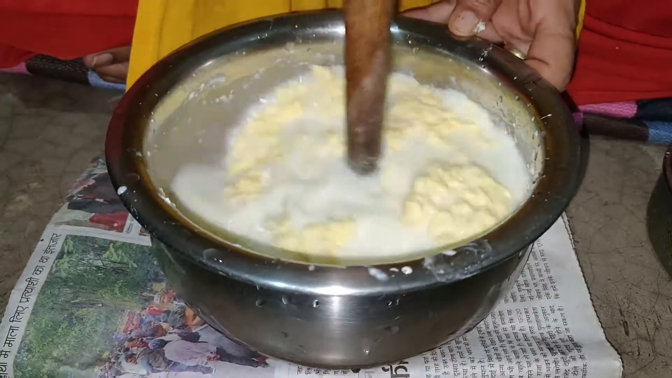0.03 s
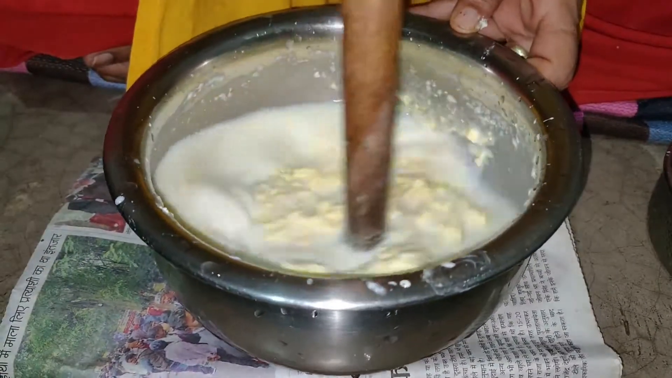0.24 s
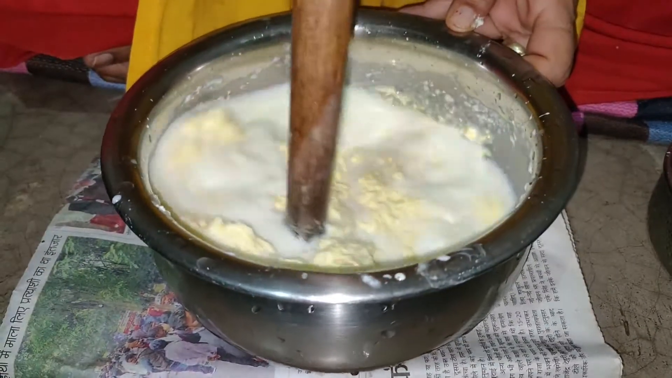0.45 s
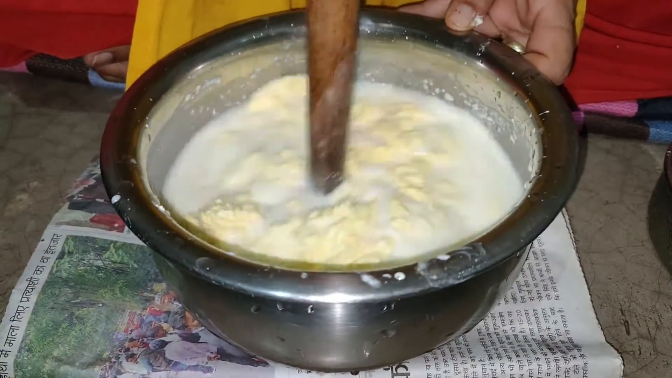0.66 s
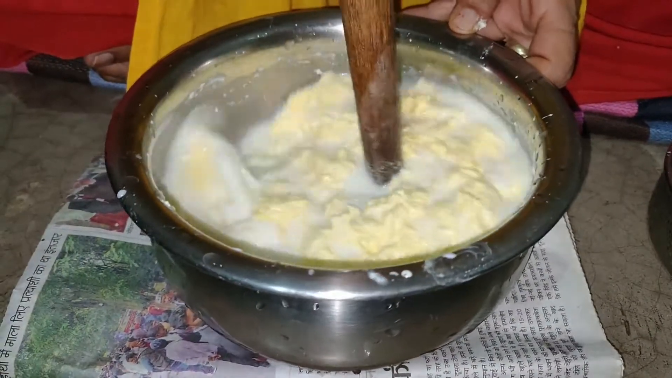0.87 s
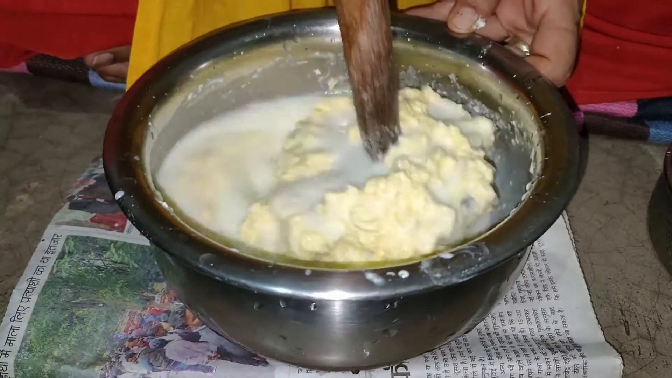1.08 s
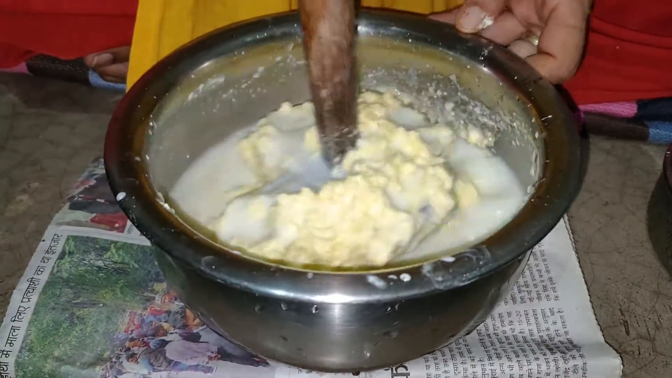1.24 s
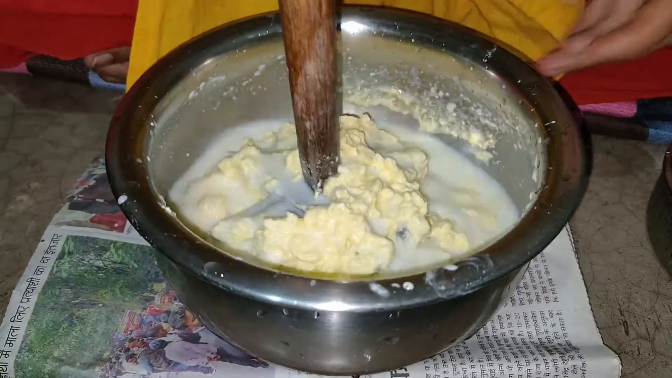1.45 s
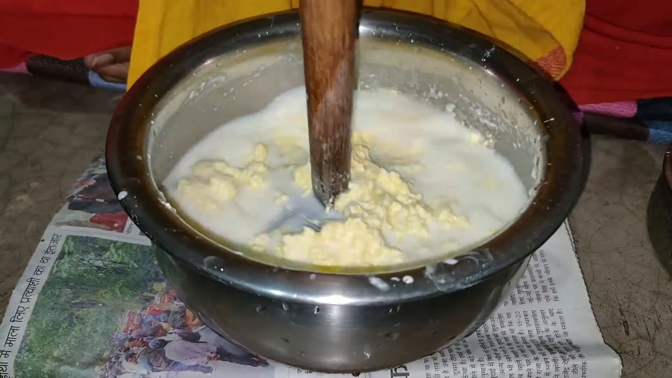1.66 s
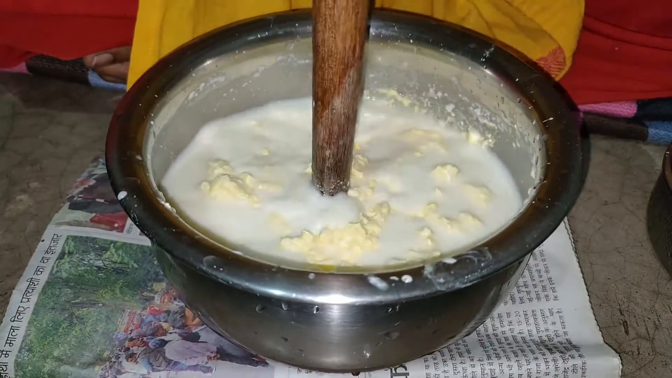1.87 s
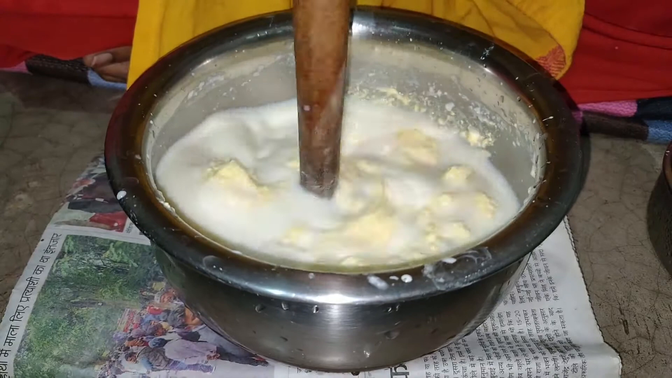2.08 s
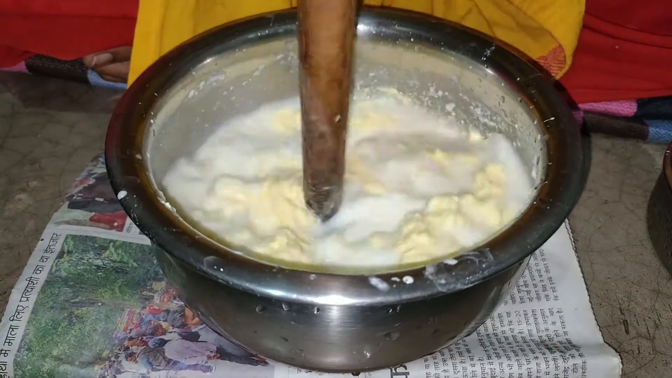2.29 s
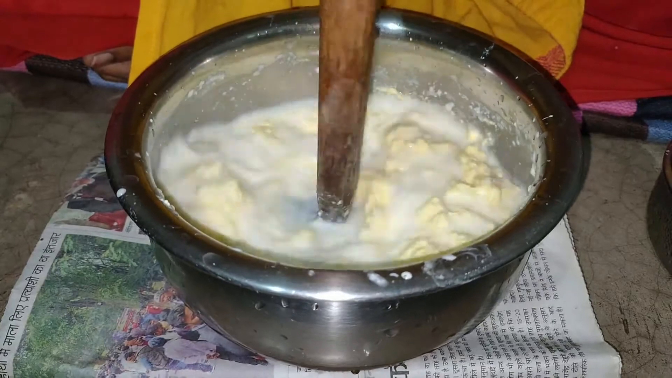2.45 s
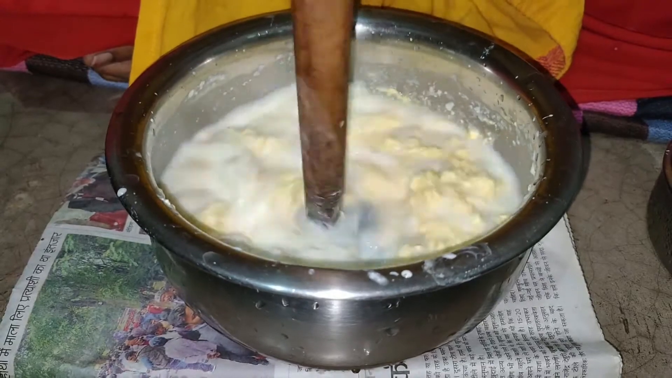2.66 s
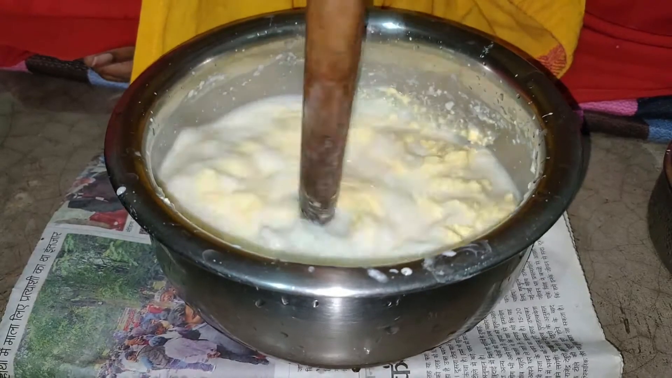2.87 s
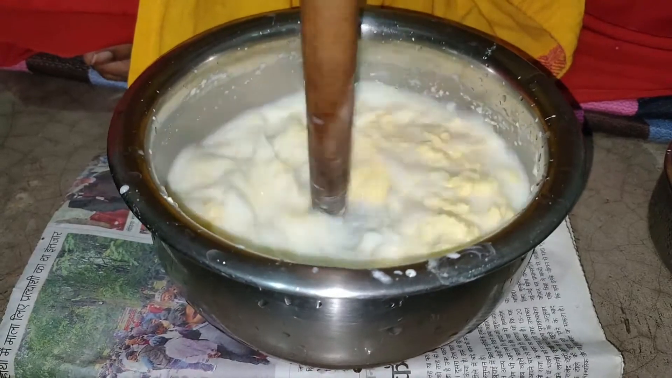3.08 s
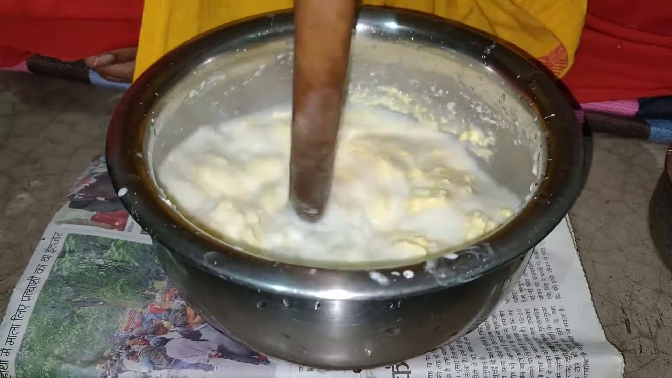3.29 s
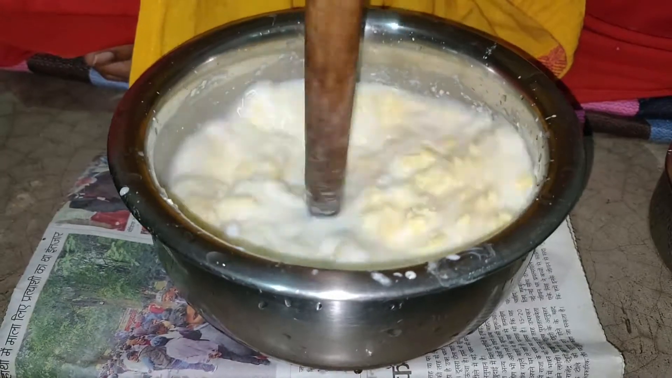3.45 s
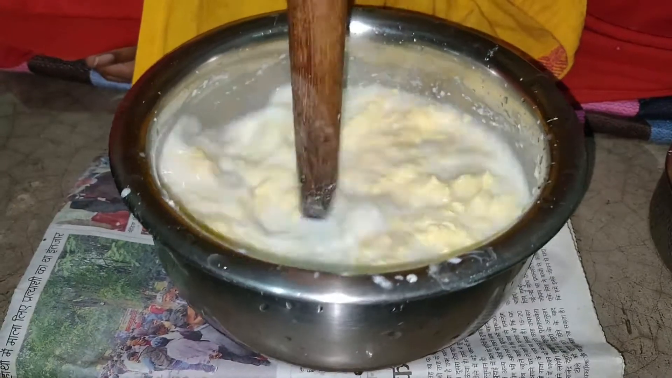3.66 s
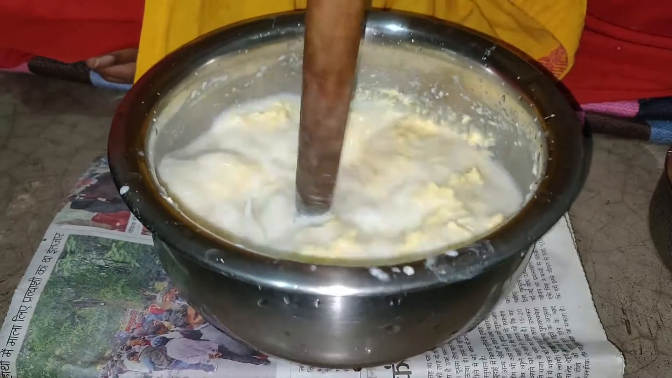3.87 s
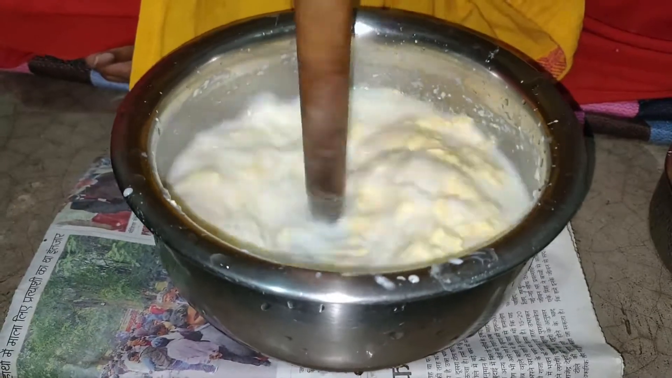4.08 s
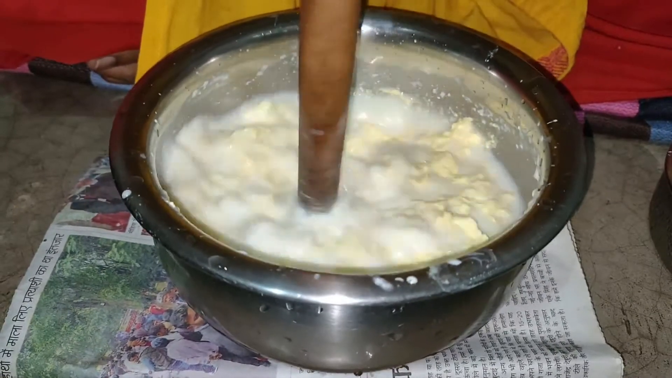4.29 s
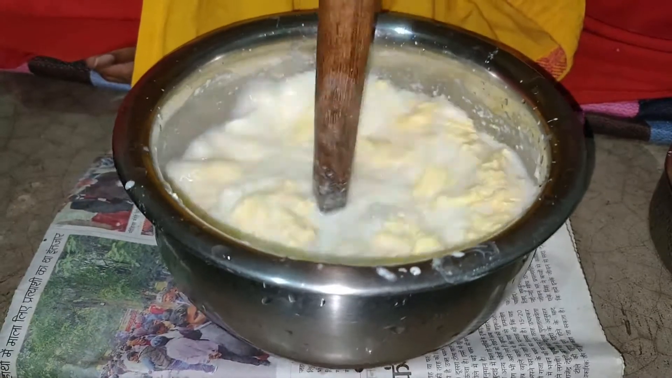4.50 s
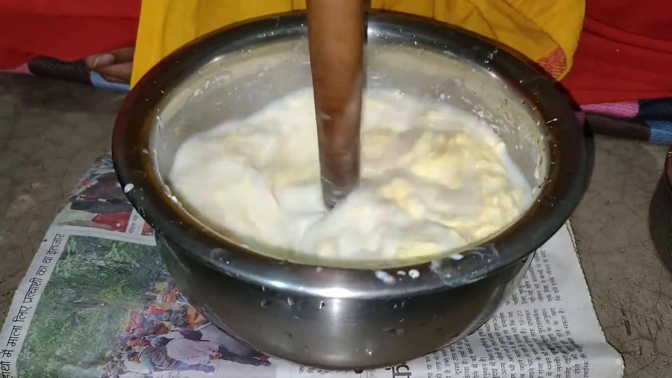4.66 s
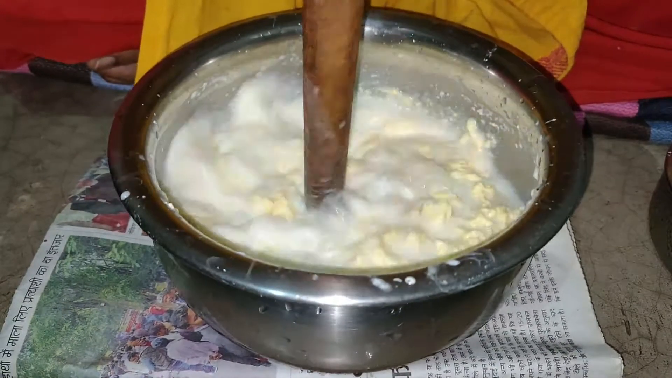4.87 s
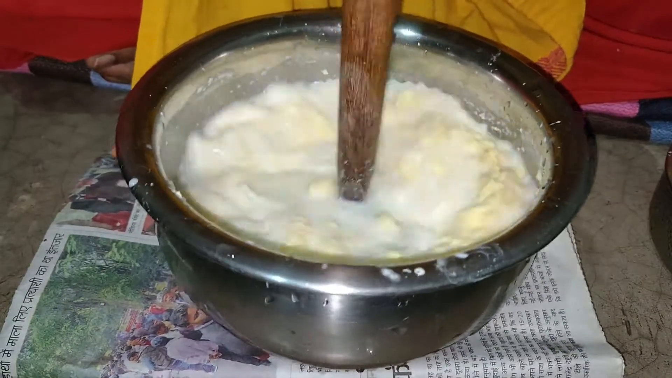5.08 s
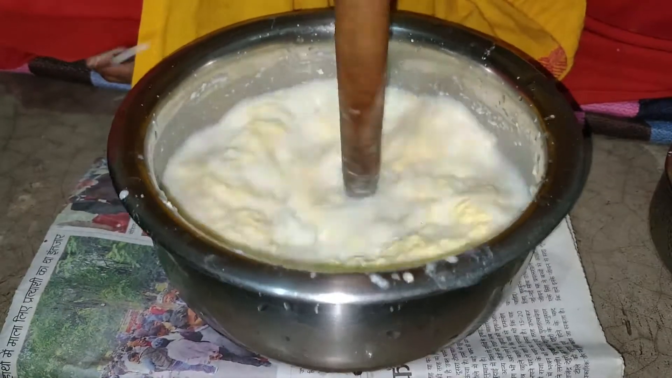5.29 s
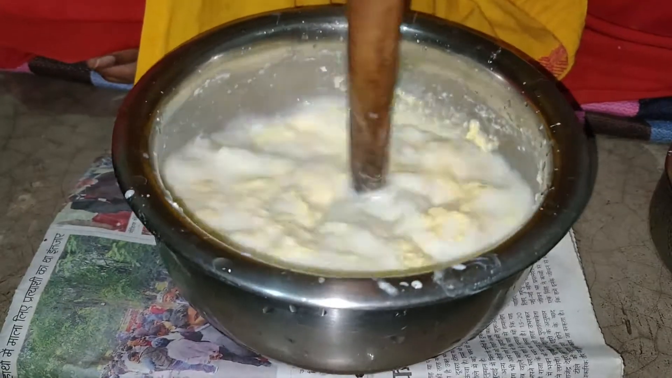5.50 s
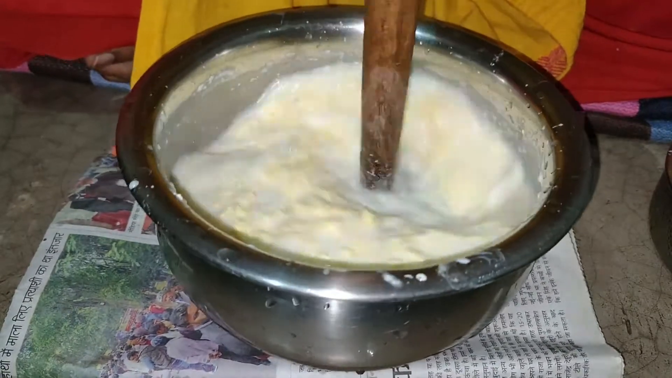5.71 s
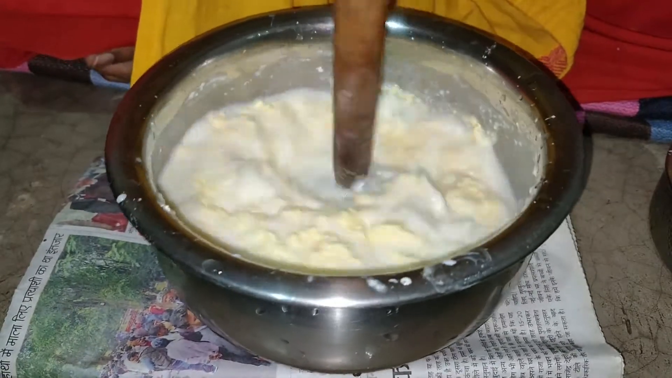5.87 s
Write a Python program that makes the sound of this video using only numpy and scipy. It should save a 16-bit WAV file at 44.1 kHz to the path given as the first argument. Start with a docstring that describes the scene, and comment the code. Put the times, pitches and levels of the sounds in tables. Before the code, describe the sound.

A wooden churn works thick, buttery liquid in a full steel bowl, close up in a small room with a low ceiling reflection and short tail. In the first second there are only soft, damped thuds near 0.04, 0.3, 0.4 and 0.83 s, with tiny plops and a faint clink. Small bubbles and drops spatter at about 1.0 to 1.5 s, sharpest near 1.45, then it quiets. At 2.15 s a short low bump knocks the right microphone. From 2.4 s strokes crowd together: lumpy slosh, gurgle and hollow mid-pitched plops, sharp spits of drops, and bright, short clinks at 2.7, 3.05, 3.5 and 4.07 s. The churning grows fuller and louder, with an especially strong plop at 4.8 s and heavy swashing from 5.3 s. Two close thuds land at 5.9 s. Left is bright; right is duller, with steady hollow hiss throughout.

```python
"""A wooden churn is twirled in a steel bowl of cream that is breaking into butter, in a small kitchen.
At first damped bowl modes thud softly; after a second bubbles and drops spatter, and at 2.15 s the
right microphone is bumped. Then the strokes crowd together: swarms of bubbles slosh and gurgle, large
air pockets plop, drops spit, sines clink, and two last thuds fall near the end. Throughout, the ceiling
and a short tail answer the bowl, and filtered noise hisses in the right microphone."""
import sys
import numpy as np
from scipy import signal
from scipy.fft import rfft, irfft
from scipy.io import wavfile

SR = 44100
rng = np.random.default_rng(int(sys.argv[2]) if len(sys.argv) > 2 else 0)


def transcribe(u):
    """Save the signal u as a 16-bit wav file named by the first command-line argument.

    u: samples, shape (n,) or (channels, n), limited to [-1, 1]; the rate is SR.
    q: integer samples, one column per channel.
    """
    v = np.clip(np.atleast_2d(u).T, -1, 1)
    q = np.round(v * 32767).astype(np.int16)
    wavfile.write(sys.argv[1], SR, q)


N = 261954
TIME = np.arange(N) / SR

# the churn nudges the bottom of the bowl: t/s, relative level/dB
NUDGES = [(0.036, -15.5), (0.266, -26), (0.408, -22.5), (0.825, -16.5), (0.838, -27), (2.673, -31.5),
          (5.897, -12.5), (5.919, -19)]


def from_db(db):
    """Amplitude ratio: 20 dB is a factor of ten."""
    return 10 ** (np.asarray(db) / 20)


def rms_one(x):
    """Normalization: mean square, hence power, becomes one."""
    return x / np.sqrt(np.mean(x ** 2) + 1e-20)


def at_hz(points, hz, column=1):
    """Interpolation on a logarithmic frequency axis, where equal ratios are equal steps."""
    points = np.array(points)
    return np.interp(np.log(hz + 1e-3), np.log(points[:, 0]), points[:, column])


def cut(x, hz, kind, order=2):
    """Butterworth filtering: a maximally flat pass band."""
    sections = signal.butter(order, hz, kind, fs=SR, output="sos")
    return signal.sosfilt(sections, x + 1e-18)


def delayed(x, s):
    """Propagation delay: the same signal s seconds later, or earlier if s is negative."""
    return np.interp(TIME - s, TIME, x, left=0)


def add(out, s, sound):
    """Superposition: a short sound is summed in at time s."""
    start = max(round(s * SR), 0)
    out[start:start + len(sound)] += sound[:max(N - start, 0)]


def ring(drive, hz, t60):
    """Damped resonance: a unit click sets a decaying sine of about unit height ringing."""
    radius = from_db(-60 / (t60 * SR))
    angle = 2 * np.pi * hz / SR
    return signal.lfilter([0, np.sin(angle)], [1, -2 * radius * np.cos(angle), radius * radius], drive + 1e-18)


def microphone_noise():
    """Stationary noise and damped resonance: air in both channels, hollow hiss and one bump at right."""
    hiss_db, air_db = -38, -65
    # spectrum of the hiss: f/Hz, relative level/dB
    hiss_spectrum = [(25, -11.5), (65, -42), (115, -1), (320, -4), (510, -21.5), (650, -3.5), (770, -8.5),
                     (930, 3.5), (1090, 2.5), (1330, -14), (2000, 0), (3600, -11.5), (4500, -32.5),
                     (7000, -28)]
    hz = np.arange(N // 2 + 1) * SR / N
    coloured = irfft(rfft(rng.standard_normal(N)) * from_db(at_hz(hiss_spectrum, hz)), N)
    hiss = from_db(hiss_db) * rms_one(cut(coloured, 7500, "low"))
    air = from_db(air_db) * rms_one(cut(rng.standard_normal((2, N)), 7000, "low"))
    touch = np.zeros(N)
    add(touch, 2.1503, from_db([-7]))
    resonances = ring(-touch, 143, 0.05) + from_db(6) * ring(-touch, 220, 0.0044)
    bump = cut(resonances, 99, "high", order=4)
    return air + (hiss + bump) * [[0], [1]]


def kitchen(x, ceiling_db=-13, flutter_db=-22, alike_hz=1100):
    """Reflection and reverberation: two dull ceiling returns, and a tail more alike in both ears in the bass."""
    ceiling_s = 0.0203
    # the tail: f/Hz, relative level/dB, t60/s
    tail_bands = [(119, -1.5, 0.28), (400, -6.5, 0.45), (900, -6, 0.35), (2010, -5.5, 0.17),
                  (4550, -9.5, 0.16), (8250, -5.5, 0.39)]
    t, edges = TIME[:SR // 2], np.geomspace(70, 11000, 13)
    tail, white = 0, rng.standard_normal((2, 2, len(t)))
    for k, (low, high) in enumerate(zip(edges, edges[1:])):
        hz = np.sqrt(low * high)
        mid, side = cut(white[k % 2], [low, high], "band")
        decay = from_db(-60 * t / at_hz(tail_bands, hz, column=2))
        decay = decay * (1 - np.exp(-t / 0.00029))   # reflections take a moment to build
        alike = 0.59 / (1 + (hz / alike_hz) ** 4)
        both = np.sqrt(1 + alike) * mid + np.sqrt(max(1 - alike, 0)) * side * [[1], [-1]]
        tail = tail + from_db(at_hz(tail_bands, hz)) * both * decay / np.sqrt(2 * np.sum(decay ** 2))
    dull = cut(x, 2500, "low", order=1)
    first = from_db(ceiling_db) * delayed(dull, ceiling_s)
    second = from_db(flutter_db) * delayed(dull, 2 * ceiling_s)
    return first + second + signal.fftconvolve(x[None], tail, axes=1)[:, :N]


def rim(splash):
    """Forced resonance: the free steel rim rings faintly along with the splashing."""
    # f/Hz, drive level/dB, t60/s
    rim_modes = [(3326, -69, 0.33), (4630, -68, 0.16), (6150, -64.5, 0.58), (8000, -68, 0.38)]
    return sum(from_db(level_db) * ring(splash, hz, t60) for hz, level_db, t60 in rim_modes)


def clinks(touch_s=0.00069):
    """Damped vibration: something small and hard gives one bright partial that skin contact soon damps."""
    # t/s, envelope level/dB, f/Hz, t60/s
    clink_rows = [(0.181, -34.5, 5027, 0.098), (.84, -49.5, 5060, 0.19), (2.677, -25.5, 4430, 0.047),
                  (2.69, -34.5, 5110, 0.42), (3.049, -11, 5900, 0.039), (3.052, -26, 4380, .1),
                  (3.527, -5, 5810, 0.024), (3.529, -23, 4380, 0.15), (4.072, -15.5, 5790, 0.038),
                  (4.075, -30, 4430, 0.16)]
    out, t = np.zeros(N), TIME[:SR // 2]
    for s, level_db, hz, t60 in clink_rows:
        envelope = from_db(level_db - 60 * t / t60) * (1 - np.exp(-t / touch_s))
        add(out, s, envelope * np.sin(2 * np.pi * hz * t))
    return out


def thuds():
    """Modal excitation: soft wooden blows share out their force differently among the liquid-damped modes."""
    # the full bowl on the floor: f/Hz, relative level/dB, t60/s
    bowl_modes = [(136, -13, 0.076), (165, -12.5, 0.062), (224, -9.5, 0.064), (314, -12.5, 0.047),
                  (409, -10, 0.029), (520, -23, 0.045)]
    out, strengths_db = np.zeros(N), rng.normal(0, 1.8, (len(NUDGES), len(bowl_modes)))
    for k, (hz, mode_db, t60) in enumerate(bowl_modes):
        clicks = np.zeros(N)
        for (s, level_db), luck_db in zip(NUDGES, strengths_db[:, k]):
            add(clicks, s + 0.0038, from_db([level_db + mode_db + luck_db]))
        out += (-1) ** k * ring(clicks, hz, t60)   # neighbouring modes have opposite sign
    return from_db(4.5) * cut(out, 110, "high", order=3)


def waves():
    """Addition of powers: every pull adds its wave to the swirl, giving slosh, spray and gurgle strengths."""
    # a wave breaks at once, sags, then falls back after the pull
    attack_s, release_s, sag_db_per_s = 0.018, 0.04, 20
    swirl_spray_db, swirl_gurgle_db = -4.5, -6   # against the swirl's slosh
    # the liquid keeps swirling between pulls: t/s, relative level/dB
    swirl_points = [(0, -62), (2.33, -72.5), (2.7, -43), (2.98, -45), (3.2, -39), (4.02, -37.5),
                    (4.57, -38), (4.9, -30.5), (5.22, -32), (5.5, -24.5), (5.94, -28.5)]
    # pulls: start t/s, length/s, relative slosh level/dB, spray against slosh/dB, gurgle against slosh/dB
    strokes = [(1.008, 0.026, -52.5, 12.5, -25), (1.1, 0.042, -38, -1, -35), (1.42, 0.031, -32, 4, -25),
               (2.376, 0.1, -37, 0.5, -1), (2.599, 0.27, -35, -7, -27), (3, 0.2, -28, -1.5, -16.5),
               (3.38, 0.013, -34, 6.5, 4), (3.505, 0.17, -37.5, 3.5, -26), (3.605, 0.13, -22.5, -1, -4),
               (3.795, 0.089, -24, -9.5, 0.5), (4.053, 0.11, -27.5, -2, -3.5), (4.142, .17, -21, -1, -2),
               (4.361, 0.14, -25.5, -2.5, 3.5), (4.596, 0.11, -32, -0.5, 3.5),
               (4.704, .14, -26.5, 1.5, 5.5), (4.96, 0.12, -29.5, 2.5, 0), (5.285, 0.13, -26.5, 1, 4),
               (5.584, 0.22, -20, -5.5, -2), (5.82, 0.17, -24, -8.5, 0)]
    swirl = from_db(np.interp(TIME, *np.transpose(swirl_points)))
    power = np.outer(from_db([0, swirl_spray_db, swirl_gurgle_db]), swirl) ** 2
    for start, length, level_db, spray_db, gurgle_db in strokes:
        age = np.maximum(TIME - start, 0)
        wave = np.minimum(age / attack_s, 1) * from_db(level_db - sag_db_per_s * age)
        wave = wave * np.exp(-np.maximum(age - length, 0) / release_s)
        power += np.outer(from_db([0, spray_db, gurgle_db]), wave) ** 2
    return np.sqrt(power)


def aftermath(rows, share_db, fade_s):
    """Exponential relaxation: the strength of the flurry of small bubbles each pop or thud leaves."""
    out = np.zeros(N)
    for s, level_db, *_ in rows:
        add(out, s, from_db(level_db + share_db) * np.exp(-TIME[:SR // 3] / fade_s))
    return out


def lumps(depth_db, rate_hz):
    """Amplitude modulation: clots of butter pass the blades unevenly, so the wash comes in lumps."""
    wander = rms_one(cut(rng.standard_normal(N), rate_hz, "low"))
    return rms_one(from_db(depth_db * np.tanh(wander)))


def bubble(hz, swell, rise):
    """Bubble oscillation: it swells and dies, and its pitch rises as it nears the surface."""
    age = TIME[:int(10 * swell * SR) + 2] / swell   # in swell times
    envelope = age * np.exp(1 - age)   # peaks at age 1
    pitch = hz * (1 + rise * np.tanh(age / 2 - 1 / 2))
    return envelope * np.sin(2 * np.pi * np.cumsum(pitch) / SR)


def pops(rows, rise, smack_db, smack_s):
    """Impact and cavity oscillation: each loud bubble is a wet noise smack together with a tone."""
    out, t = np.zeros(N), TIME[:SR // 20]
    smacks = rng.standard_normal((len(rows), len(t))) * t / smack_s * np.exp(1 - t / smack_s)
    for (s, level_db, hz, swell), smack in zip(rows, smacks):
        add(out, s, from_db(level_db) * bubble(hz, max(swell, 1e-4), rise))
        add(out, s, from_db(level_db + smack_db) * smack)
    return out


def swarm(low_hz, high_hz, per_s, cycles, spread_db, apart_s, count=32):
    """Random superposition: many small bubbles, with an interaural delay for each pitch's place in the bowl."""
    # strength of the small bubbles by pitch: f/Hz, relative level/dB
    bubble_colour = [(170, -12), (320, 0), (520, 16.5), (640, -6), (850, 5), (1000, 3), (1300, -23),
                     (1600, -1), (2200, -6), (3100, -9), (4300, 6.5), (5000, -1), (6000, 7), (7500, -5)]
    sizes = from_db(spread_db * np.minimum(rng.exponential(1, N), 3)) * rng.choice([-1, 1], N)
    clicks = sizes * (rng.random(N) < per_s / SR)
    dealt, out = rng.integers(0, count, N), np.zeros((2, N))   # each click is dealt to one pitch
    for k, hz in enumerate(np.geomspace(low_hz, high_hz, count)):
        strength = from_db(at_hz(bubble_colour, hz)) * np.sqrt(hz)
        grain = strength * bubble(hz, cycles / hz, rise=0.014)
        voice = signal.oaconvolve(clicks * (dealt == k), grain)[:N]
        out += [voice, delayed(voice, apart_s * rng.uniform(-1.96, 1))]
    return rms_one(out)


def liquid(gurgle_db=-5.5, slosh_db=-4.0, spray_db=-2.0, blip_db=-7, drip_db=-8):
    """Bubble acoustics: blades drag air under (gurgle), fold the surface (slosh) and fling drops (spray)."""
    gurgle_lag_s = 0.0091   # air dragged under comes up a little later
    # the biggest air pockets closing in the buttermilk: t/s, relative level/dB, f/Hz, swell time/s
    plop_rows = [(.0385, -20.5, 834, 0.00061), (.104, -27.5, 840, 0.0011), (1.1362, -27, 1040, 0.0014),
                 (1.138, -29.5, 1750, 0.0025), (1.375, -35, 730, 0.00049), (1.4231, -13.5, 940, 0.00075),
                 (1.9981, -31, 492, .0038), (2.3832, -13, 757, 0.00055), (2.4366, -27, 1710, 0.0037),
                 (2.477, -19.5, 960, 0.00041), (2.6075, -19.5, 1220, 0.00048), (2.6406, -24, 845, 0.0013),
                 (2.6642, -9, 820, 0.0011), (2.7741, -17.5, 795, 0.0024), (2.9294, -23, 855, 0.0011),
                 (3.029, -10, 978, 0.0017), (3.0823, -17, 890, 0.0021), (3.121, -18, 444, 0.003),
                 (3.2929, -16.5, 843, 0.0014), (3.3957, -14.5, 755, 0.00097), (3.5005, -10, 955, 0.0012),
                 (3.593, -19.5, 860, .0014), (3.6305, -17, 850, 0.00077), (3.6421, -20, 1600, 0.002),
                 (3.6865, -12, 770, 0.0044), (3.7011, -14.5, 417, 0.0021), (3.763, -10, 910, 0.00086),
                 (3.8387, -10, 770, .0013), (3.8682, -19, 1006, 0.0024), (3.9101, -19, 450, 0.0014),
                 (3.9452, -8, 1000, 0.00013), (4.039, -19, 520, 0.00059), (4.0777, -8.5, 850, 0.001),
                 (4.2323, -5.5, 760, 0.00051), (4.382, -14, 675, 0.00058), (4.423, -8, 816, 0.0012),
                 (4.428, -13.5, 300, 0.0019), (4.608, -1.5, 1033, 0.00094), (4.7221, -17.5, 800, 0.00092),
                 (4.7425, -7, 835, .002), (4.8035, 2, 888, 0.0011), (4.8829, -12.5, 900, 0.0052),
                 (4.9265, -6.5, 910, 0.0011), (5.0388, -14, 413, 0.0015), (5.1506, -11.5, 1504, 0.0029),
                 (5.1874, -9.5, 1690, 0.0015), (5.319, -16.5, 295, 0.0034), (5.3459, -5, 647, 0.00057),
                 (5.3704, -11, 1074, .0017), (5.4961, -11.5, 1750, 0.00084), (5.5096, -11, 940, 0.0012),
                 (5.6377, -3.5, 1220, 0.00027), (5.66, -14, 300, 0.0015), (5.6768, -8.5, 958, 0.0021),
                 (5.7261, -14, 343, 0.0016), (5.7947, -4.5, 924, 0.0035), (5.8193, -12, 1520, 0.0019),
                 (5.8254, -4.5, 842, 0.0023)]
    # the sharpest drops landing: t/s, relative level/dB, f/Hz, swell time/s (at least 0.0001 is used)
    spit_rows = [(1.0015, -28.5, 5300, 0.00026), (1.0318, -23.5, 4180, .0002),
                 (1.4236, -6.5, 4800, 0.00005), (1.4602, -7, 6350, 0.00055), (1.4742, -13, 5530, 0.00036),
                 (2.4457, -24, 4040, 0.00042), (2.4575, -24, 4060, 0.00041), (2.7739, -18.5, 4900, .0002),
                 (2.9485, -27.5, 4560, .001), (3.0137, -10, 4740, 0.00014), (3.0289, -17, 5400, .0003),
                 (3.1095, -11.5, 4030, 0.00043), (3.2169, -19, 5600, 0.0015), (3.2286, -3, 5870, 0.00038),
                 (3.6245, -2, 6000, 0.00023), (3.9457, -5.5, 4950, 0.00017), (4.1996, -15.5, 4200, 0.003),
                 (4.2985, 1.5, 6400, 0.00026), (4.4247, -13, 4260, 0.0014), (4.589, -12, 6030, 0.00047),
                 (4.769, -11, 6060, 0.00055), (4.7956, -6.5, 3870, 0.00072), (4.805, -4, 5550, 0.00088),
                 (4.833, -13, 5760, 0.00058), (4.9547, -5, 4800, 0.00046), (5.0199, -14.5, 4870, 0.00065),
                 (5.109, -13.5, 3650, 0.00078), (5.3449, -3.5, 4250, 0.00008),
                 (5.4223, -4.5, 4830, 0.000073), (5.593, -9, 5820, .0011), (5.638, -3.5, 3880, 0.00019),
                 (5.6941, -11, 4110, 0.00095), (5.7666, -11.5, 4480, 0.0018), (5.7786, -6.5, 5960, .0009),
                 (5.9273, -8, 5820, 0.00035)]
    surface, flung, deep = waves()

    # stray blips and drips follow the waves alone
    blip_swarm = swarm(717.5, 1793, per_s=55, cycles=2.8, spread_db=-1.0, apart_s=0.0001, count=12)
    drip_swarm = swarm(3600, 7000, per_s=170, cycles=7.8, spread_db=8.0, apart_s=0.00019, count=12)
    blips = from_db(blip_db) * surface * blip_swarm
    drips = from_db(drip_db) * flung * drip_swarm

    # flurries add to the waves in power
    shaken = aftermath(NUDGES, share_db=-15.5, fade_s=0.021)   # a thud sets the liquid wobbling
    deep = from_db(gurgle_db) * delayed(np.hypot(deep, shaken), gurgle_lag_s)
    deep = np.hypot(deep, aftermath(plop_rows, share_db=-30, fade_s=0.0044))
    surface = np.hypot(from_db(slosh_db) * surface, aftermath(plop_rows, share_db=-15.5, fade_s=0.0065))
    flung = np.hypot(from_db(spray_db) * flung, aftermath(spit_rows, share_db=-8.5, fade_s=0.0036))

    gurgle = deep * swarm(193.5, 581.0, per_s=260, cycles=1.6, spread_db=3.5, apart_s=0.0001)
    slosh = surface * swarm(650.0, 2683, per_s=1100, cycles=1.71, spread_db=2.0, apart_s=0.00013)
    spray = flung * swarm(2737, 8310, per_s=3400, cycles=1.9, spread_db=4.0, apart_s=0.00021)
    # the wash runs on between the loud pops
    wash = (gurgle + slosh + spray) * lumps(depth_db=6.5, rate_hz=43)

    plops = cut(pops(plop_rows, rise=0.034, smack_db=-7, smack_s=0.00067), [260, 1750], "band", order=3)
    spits = cut(pops(spit_rows, rise=0.098, smack_db=-15, smack_s=0.00061), [2200, 13000], "band")
    return wash + blips + drips + plops + from_db(3) * spits


def scene():
    """Acoustic shadowing: the left microphone faces the bowl, the right is shaded; thuds boom through the floor."""
    splash, thud = liquid(), thuds()
    near = splash + rim(splash) + clinks()
    room = kitchen(near[0] + from_db(1) * thud)
    left, right = cut(near + from_db(-3.5) * thud + room, 84, "high")
    hz = np.arange(N // 2 + 1) * SR / N
    # f/Hz, level/dB
    shade_points = [(300, 0.0), (900, -2), (2600, -3), (3700, -0.5), (4700, -15.0), (6000, -25.0), (7700, -22)]
    shaded = irfft(rfft(right) * from_db(at_hz(shade_points, hz)), N)
    return np.array([left, shaded]) + microphone_noise()


def record(dry):
    """Band limiting and clipping: treble drops to a shelf, noise is added, peaks overload, the top is cut."""
    treble_edge_hz, cutoff_hz = 7580, 16800
    narrow = signal.sosfilt(signal.ellip(8, 0.5, 60, treble_edge_hz, fs=SR, output="sos"), dry)
    shelf = from_db(-23.5) * cut(dry, 4000, "high")
    circuit = from_db(-69.5) * cut(rng.standard_normal((2, N)), 14000, "low", order=1)
    loud = np.clip(narrow + shelf + circuit, -0.93, 0.93)
    return signal.sosfilt(signal.cheby2(14, 70, cutoff_hz, fs=SR, output="sos"), loud)


dry = scene()
out = record(dry)
transcribe(out)
```